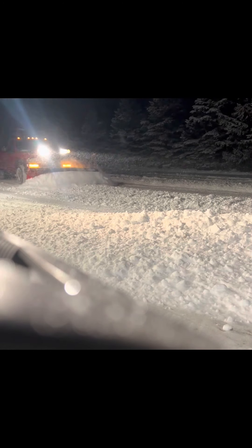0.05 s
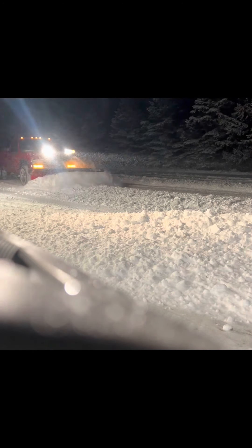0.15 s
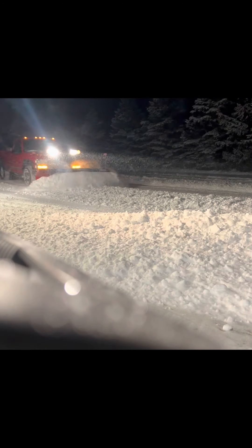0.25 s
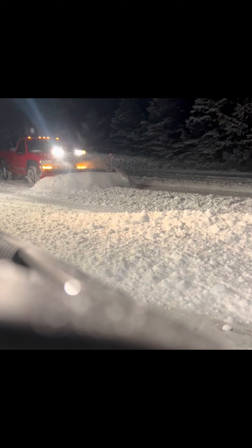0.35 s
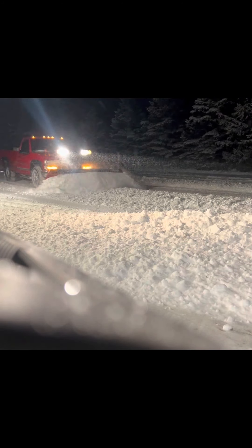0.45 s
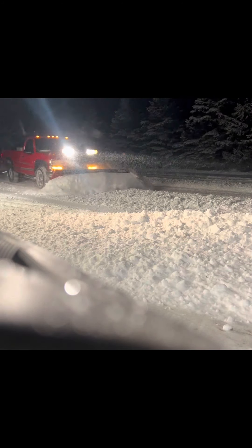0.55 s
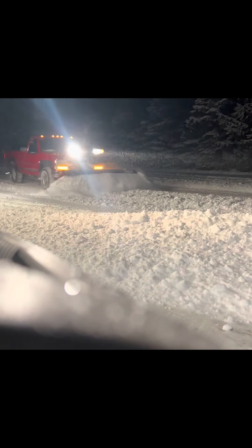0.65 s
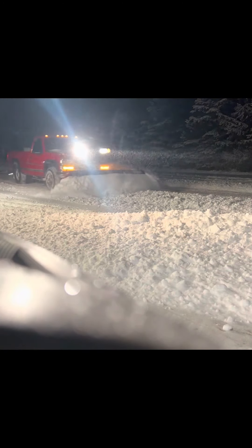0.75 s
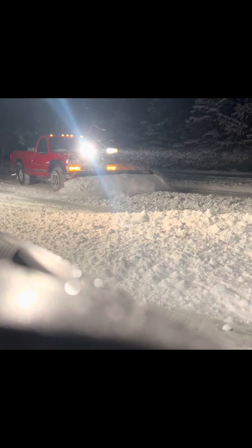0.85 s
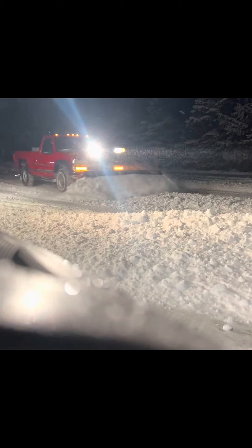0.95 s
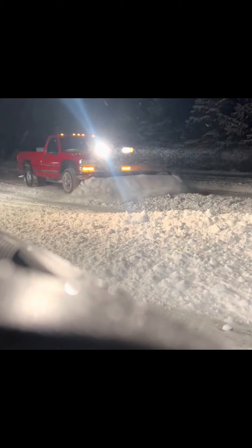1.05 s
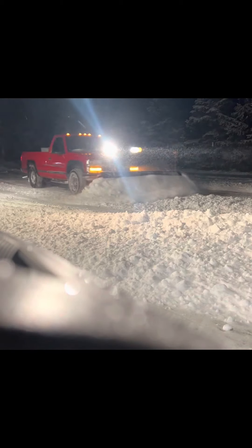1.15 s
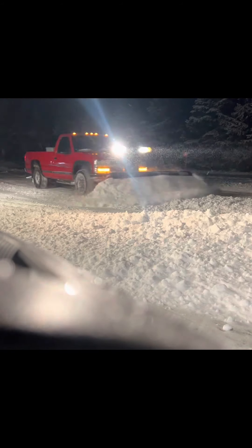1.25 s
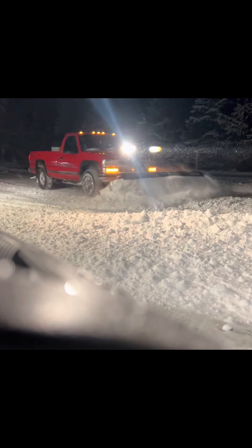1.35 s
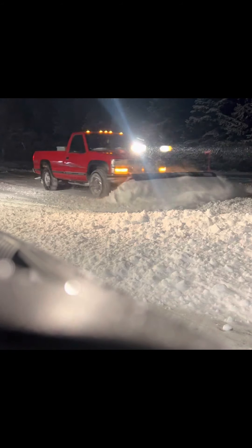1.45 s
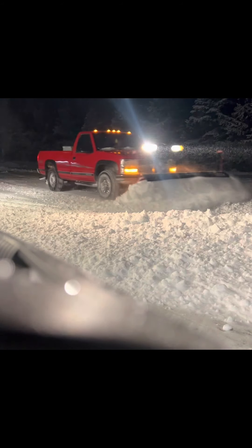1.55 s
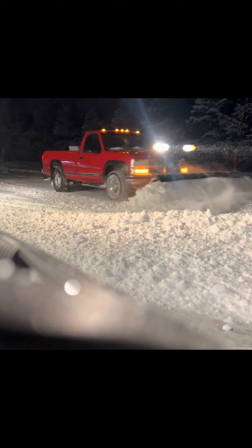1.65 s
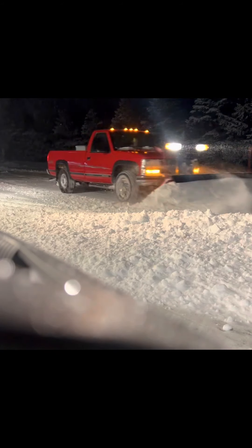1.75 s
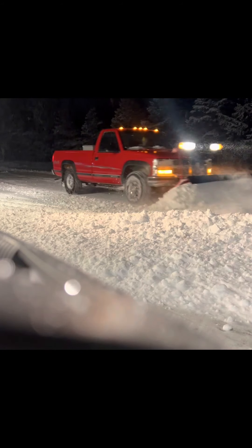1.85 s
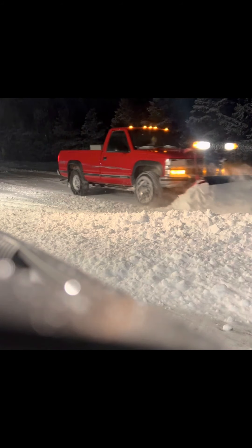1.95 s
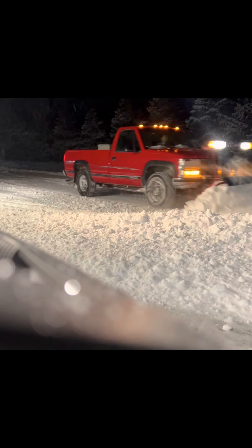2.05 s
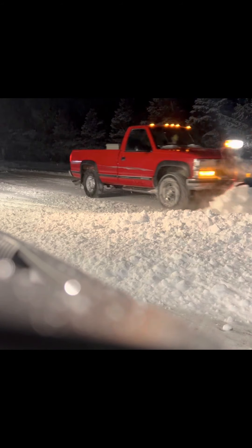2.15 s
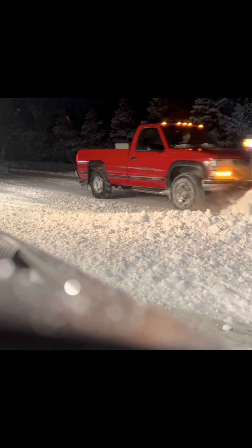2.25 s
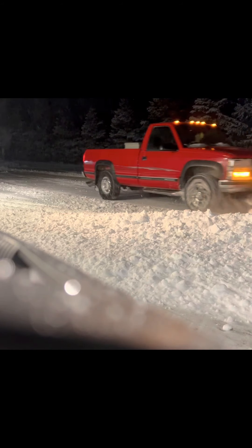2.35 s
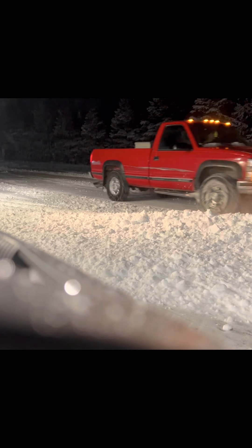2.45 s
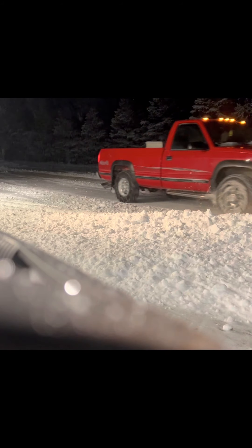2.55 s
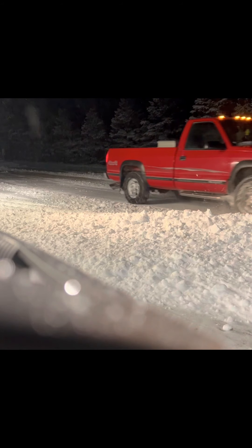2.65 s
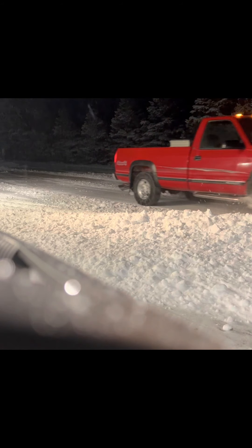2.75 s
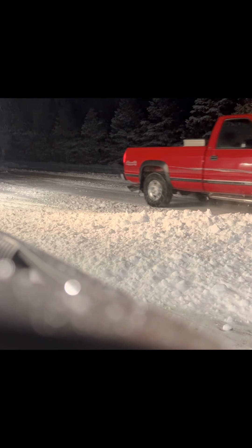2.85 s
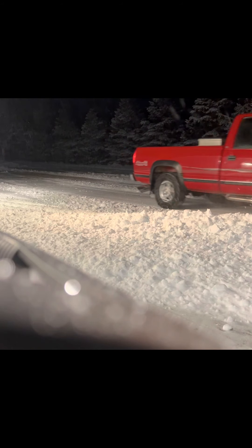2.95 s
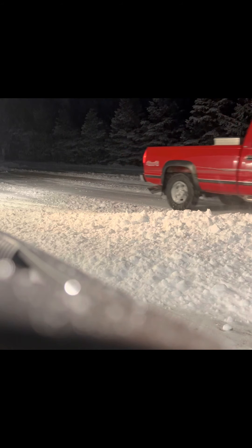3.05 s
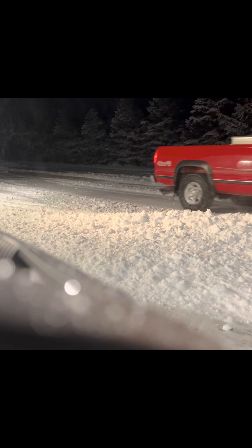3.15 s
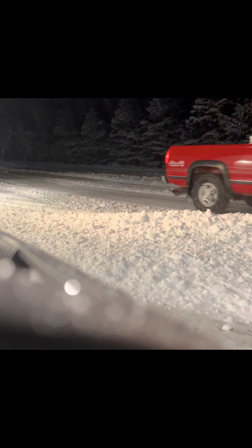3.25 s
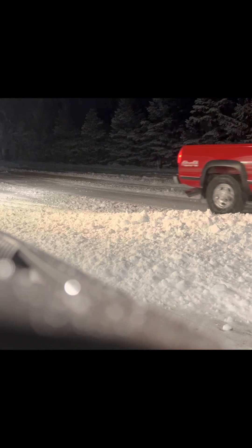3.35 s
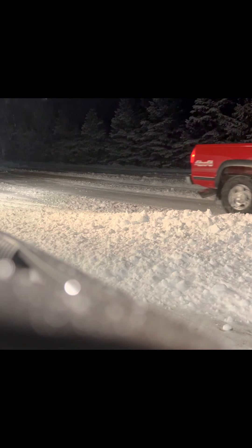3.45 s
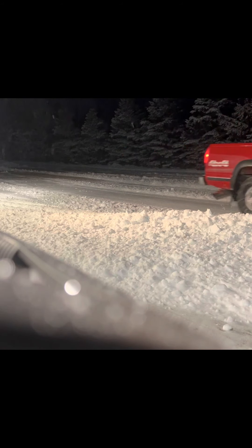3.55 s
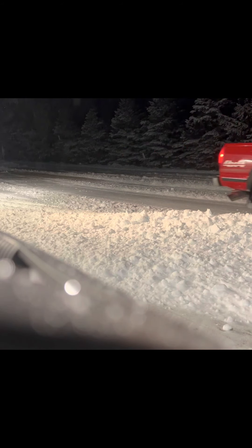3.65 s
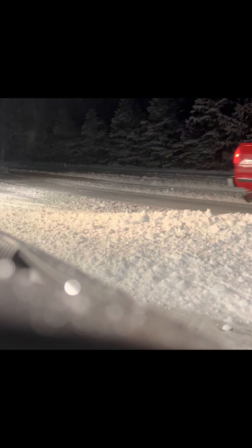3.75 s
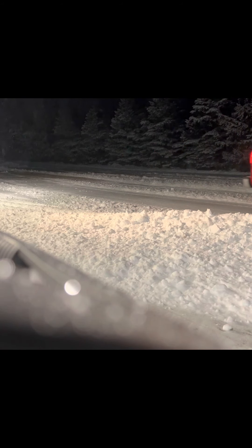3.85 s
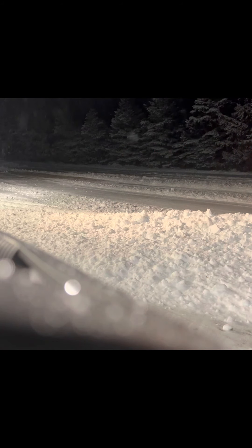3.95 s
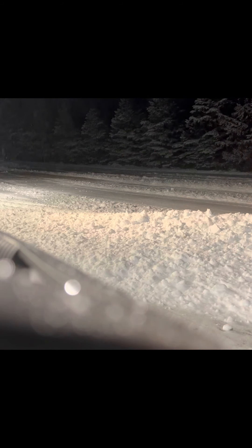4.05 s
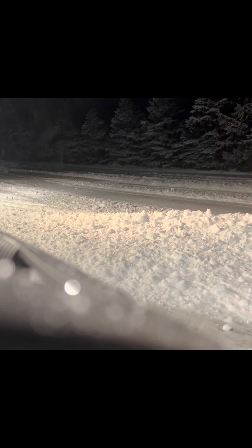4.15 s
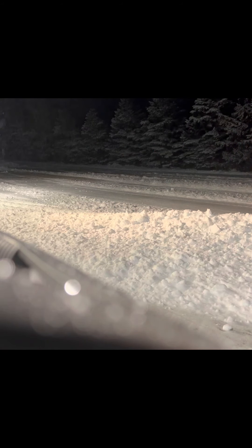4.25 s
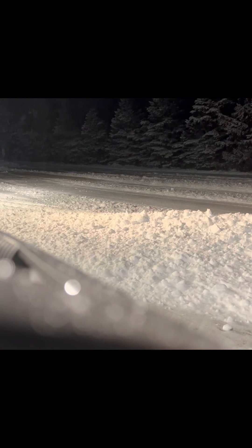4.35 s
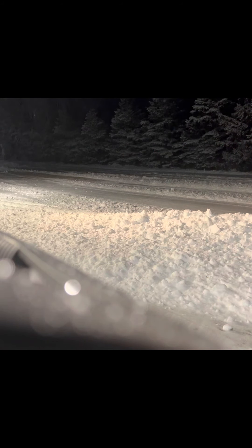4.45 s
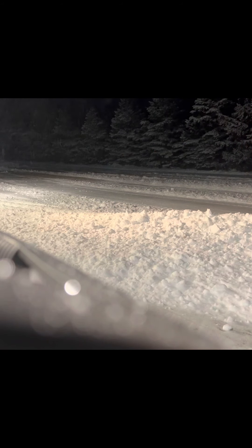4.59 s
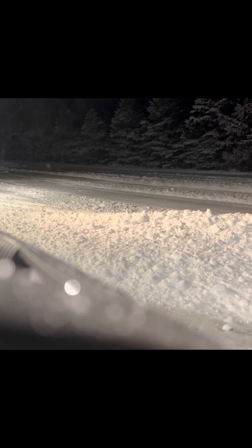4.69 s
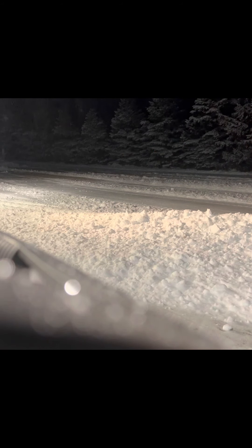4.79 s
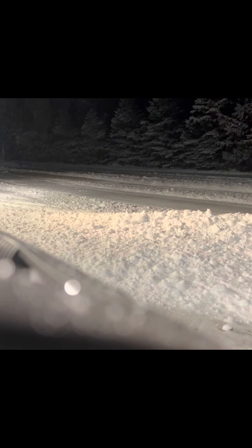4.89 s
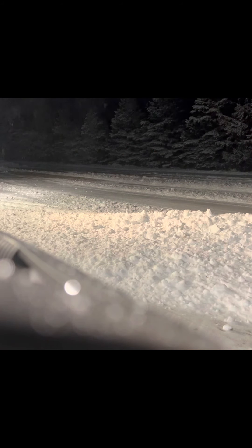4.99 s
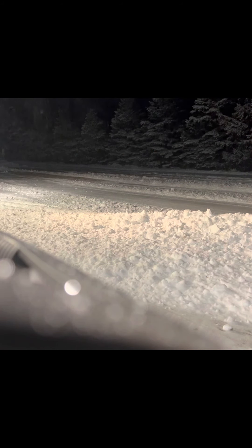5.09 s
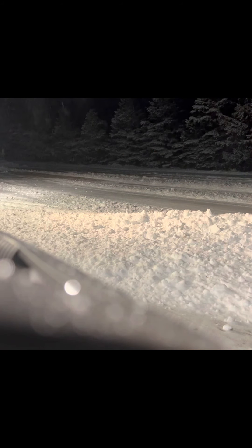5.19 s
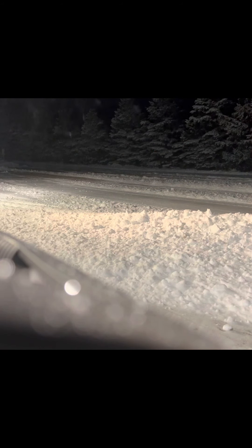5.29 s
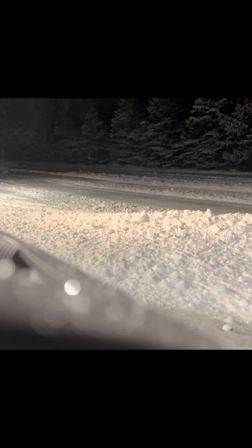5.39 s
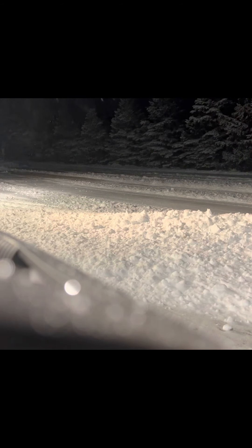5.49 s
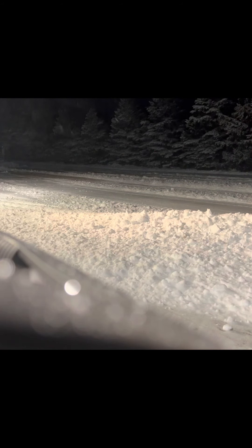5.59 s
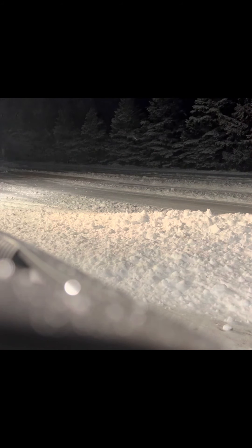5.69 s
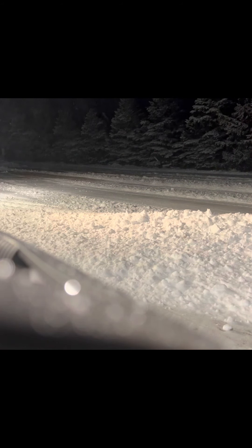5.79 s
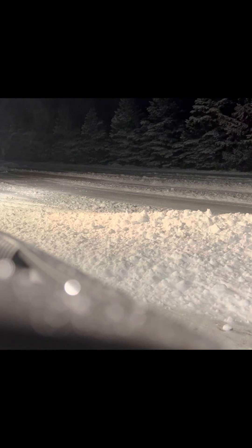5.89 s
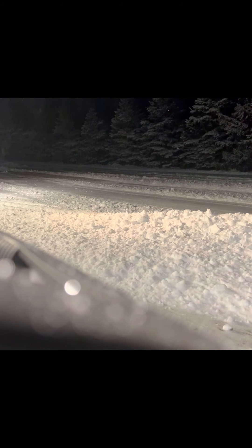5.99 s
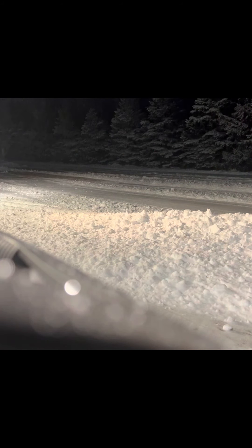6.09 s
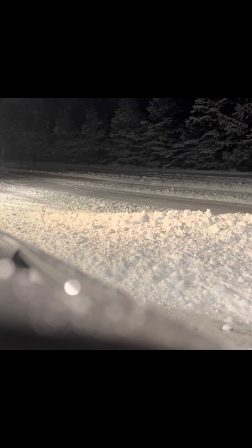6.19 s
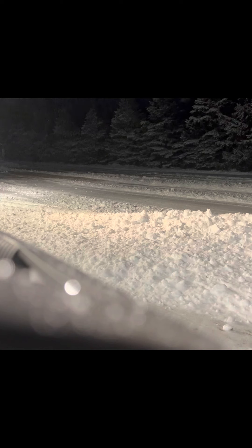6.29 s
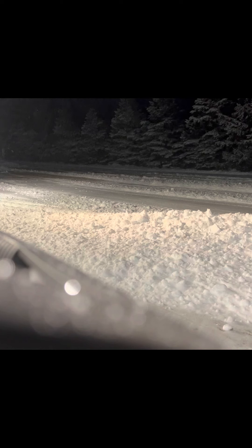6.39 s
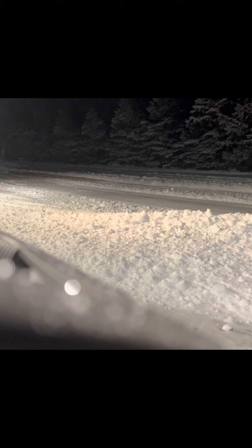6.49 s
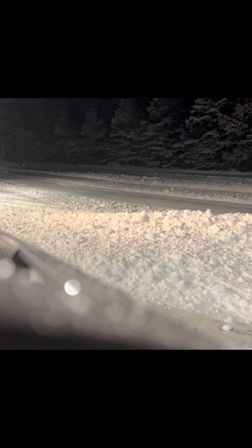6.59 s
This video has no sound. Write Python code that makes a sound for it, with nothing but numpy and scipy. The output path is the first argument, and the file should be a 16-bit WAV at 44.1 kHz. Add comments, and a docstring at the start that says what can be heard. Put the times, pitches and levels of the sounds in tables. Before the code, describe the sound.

Deep loping diesel exhaust swells by with crunching, hissing snow and blade rattle, then drops away with turbo whine, one short rev and uneven idle.

```python
"""A straight-piped diesel V8 pickup ploughs snow past a parked car, lifts off, blips the throttle and idles.
Two microphone ports at the car hear it pass 4.67 m away: uneven firings make tones that lope and boom in the cabin.
Injectors clatter as noise ringing in the panels; the turbo whistles and winds down as smeared tones.
Snow hisses and crunches in filtered grains, the blade rattles in runs of ringing knocks, metal squeaks,
and gusts of low filtered noise buffet the ports."""
import sys
import numpy as np
from scipy import signal
from scipy.fft import rfft, irfft
from scipy.io import wavfile
from scipy.ndimage import uniform_filter1d

SR = 44100
rng = np.random.default_rng(int(sys.argv[2]) if len(sys.argv) > 2 else 0)


def put_to_file(sound):
    """Save the sound as 16-bit audio at rate SR, in the file named by the first command-line argument."""
    columns = np.atleast_2d(sound).T  # one column per channel
    safe = np.clip(columns, -1, 1)
    whole_steps = np.round(safe * 32767)
    wavfile.write(sys.argv[1], SR, whole_steps.astype(np.int16))


N = 292383
TIME = np.arange(N) / SR  # s
FREQ = np.fft.rfftfreq(N, 1 / SR) + 1e-3  # Hz, kept above zero for the logarithm

# presses of the throttle: (start [s], end [s], attack [s])
PRESSES = [(0.76, 1.28, 0.16), (1.45, 4.21, 0.11), (3.3, 4.27, 0.25), (4.76, 5.14, 0.18)]
RELEASE_S = 0.07
# narrow rings of the body panels and glass: (frequency [Hz], width [Hz], lift [dB])
PANEL_RINGS = [(373, 14, -3), (446, 33, 6), (593, 18, 5.5), (674, 44, 4), (692, 26, 6.5), (1120, 32, 6),
               (847, 105, 4.5), (1950, 310, 0), (4230, 97, 6), (9400, 120, -0.5)]
NEAREST_M = 4.67  # distance of the truck as it passes
CLATTER_BAND = (650, 2400)  # Hz


def undb(db):
    """Decibels to gain."""
    return 10 ** (np.asarray(db) / 20)


def curves(table):
    """Each column of a table as a line through time."""
    s, *columns = np.transpose(table)
    return [np.interp(TIME, s, c) for c in columns]


def over_hz(points):
    """Join (Hz, value) points on a log-frequency axis."""
    hz, value = np.transpose(points)
    return np.interp(np.log(FREQ), np.log(hz), value)


def lift(hz, modes):
    """The dB that resonances add at these frequencies."""
    return sum(db / (1 + (2 * (hz - f) / width) ** 2) for f, width, db in modes)


def colour(x, db, band):
    """Filter by a dB curve and bring the rms inside the band to 1."""
    spectrum = rfft(x) * undb(db)
    inside = (FREQ > band[0]) & (FREQ < band[1])
    return irfft(spectrum, N) / irfft(spectrum * inside, N).std()


def walk(rate):
    """Smooth random drift of rms 1; a higher rate (Hz) moves faster."""
    y = irfft(rfft(rng.standard_normal(N)) * np.exp(-(FREQ / rate) ** 2), N)
    return y / y.std()


def grains(rate, spread_db):
    """Random clicks of uneven size, about rate of them a second; rms 1."""
    size = undb(spread_db * np.minimum(rng.exponential(size=N), 5))
    y = (rng.random(N) < rate / SR) * size * rng.standard_normal(N)
    return y / y.std()


def burst(start, rise, decay):
    """An envelope that swells quickly and dies away."""
    age = np.maximum(TIME - start, 0)
    return np.minimum(age / rise, 1) * np.exp(-np.maximum(age - rise, 0) / max(decay, 1e-3))


def swell(start, length):
    """A rounded bump."""
    return np.sin(np.pi * np.clip((TIME - start) / length, 0, 1))


def held(start, end, attack, release):
    """An envelope that rises from start, holds until end and falls back."""
    rising = (TIME - start) / attack
    falling = 1 - (TIME - end) / release
    return np.clip(np.minimum(rising, falling), 0, 1)


def whistle(hz, width_hz):
    """A wavering tone of rms 1: two random drifts smear its phase and strength."""
    phase = 2 * np.pi * np.cumsum(hz * np.ones(N)) / SR
    return walk(width_hz) * np.cos(phase) + walk(width_hz) * np.sin(phase)


def distance():
    """Metres from truck to microphone: a steady approach, then coasting towards a halt past the nearest point."""
    nearest_s, approach_m_s, coast_s = 3.004, 3.75, 2.38
    since = TIME - nearest_s
    coasting = coast_s * (1 - np.exp(-np.maximum(since, 0) / coast_s))
    travel_s = np.minimum(since, 0) + coasting
    return np.hypot(NEAREST_M, approach_m_s * travel_s)


def revving():
    """1 during the last press, a free rev with no load on the engine."""
    return held(*PRESSES[-1], RELEASE_S)


def levels(cycle_hz, aspect):
    """The dB of lope, overtones, clatter and hiss follow distance, the side that is heard and the throttle."""
    # layer settings at the nearest point, off throttle, before each layer's own trim:
    # (front [dB], flank [dB], rear [dB], change per doubling of distance [dB])
    lope_level = (-23.5, -20, -18, -4.5)
    overtone_level = (-30.5, -28, -25, -6)
    clatter_level = (-35.5, -42, -41, -1.5)
    hiss_level = (-40, -36.5, -41.5, -20.5)
    # what each press adds: (lope [dB, scaled by effort], overtones [dB], clatter [dB], snow hiss [dB])
    press_db = [(6, 2, -2.5, 1.5), (7, 3.5, 0, -3), (-4.5, 0.5, 2.5, 2.5), (8, 9.5, 8, 7)]
    # the idle hunts as it settles: (crest [s], lope [dB], overtones [dB])
    idle_surges = [(5.3, 1.5, 4), (5.51, 2.5, 5.5), (5.72, 6, 3.5), (6.22, 6.5, 4.5)]
    # the blade scrapes and shoves heavy snow, swelling the mid-range noise:
    # (start [s], length [s], swell of the clatter layer [dB])
    blade_shoves = [(-0.04, 0.066, 11.5), (0.705, 0.55, 4), (1.827, 0.17, 2), (2.66, 0.41, 2),
                    (3.452, 0.76, 4.5)]
    overrun_s, overrun_db = 0.15, -3.5
    surge_s, sag_share = 0.13, 0.17
    tail_on_s, tail_fade_db_per_s = 4.3, -2

    doublings = np.log2(distance() / NEAREST_M)
    lope, overtones, knock, hiss = (
        np.interp(aspect, np.arange(3), sides) + falloff * doublings
        for *sides, falloff in (lope_level, overtone_level, clatter_level, hiss_level))
    # a press changes the lope more the faster the engine turns
    effort = (cycle_hz / 9.88) ** 2.74
    for (start, end, attack), (lope_db, overtone_db, clatter_db, hiss_db) in zip(PRESSES, press_db):
        pedal = held(start, end, attack, RELEASE_S)
        lope += lope_db * pedal * effort
        lope += overrun_db * swell(end, overrun_s)  # the fuel is cut and the lope sags
        overtones += overtone_db * pedal
        knock += clatter_db * pedal
        hiss += hiss_db * pedal
    for crest, lope_db, overtone_db in idle_surges:
        surge = swell(crest - surge_s / 2, surge_s)
        sag = sag_share * swell(crest + surge_s / 2, surge_s)
        lope += lope_db * (surge - sag)
        overtones += overtone_db * surge
    # the tailgate shields the engine more and more as the truck draws away
    knock += tail_fade_db_per_s * np.maximum(TIME - tail_on_s, 0)
    knock += sum(db * swell(start, length) for start, length, db in blade_shoves)
    return lope, overtones, knock, hiss


def gusts():
    """Puffs of wind thud on the microphone as low noise, partly different at each port."""
    # (time [s], level before trim [dB], left minus right [dB], decay [s])
    puffs = [(0.062, -28, 0.5, 0.043), (0.132, -27.5, 0, 0.01), (0.226, -32, -19, 0.012),
             (0.268, -31.5, -1, 0.032), (0.325, -24, -1, 0.015), (0.345, -24.5, 1, 0.0092),
             (0.354, -26.5, -2, 0.027), (0.383, -37, -2, 0.022), (0.502, -32, -1, 0.024),
             (1.096, -22, -1, 0.017), (1.238, -25.5, -1, 0.017), (1.278, -29.5, -3, 0.0076),
             (1.291, -22, 1, 0.0097), (1.395, -27, 0, 0.0087), (5.472, -32.5, -4, 0.01),
             (5.499, -36, -3, 0.008), (5.723, -25.5, 0, 0.013)]
    # wind spectrum: (frequency [Hz], level [dB per Hz, relative])
    wind_colour = [(40, 10), (100, 9.5), (170, 15), (260, 7.5), (460, 2.5), (650, -5.5), (1100, -20),
                   (2500, -80), (8000, -70)]
    both, left, right = (colour(rng.standard_normal(N), over_hz(wind_colour), (250, 700)) for _ in range(3))
    air = both + .5 * np.array([left, right])
    strength = 0
    for s, db, pan, decay in puffs:
        port_db = db - 1.0 + np.array([[pan], [-pan]]) / 2
        strength = strength + undb(port_db) * burst(s - .001, 0.0031, decay)
    return air * strength


def squeals():
    """Faint thin tones of rubbing metal glide in pitch and level off as the truck slows."""
    # (start [s], end [s], first pitch [Hz], last pitch [Hz], level [dB])
    glides = [(5.65, 6.278, 10250, 10930, -59.5), (5.903, 6.287, 10400, 10220, -62)]
    glide_s = 0.13
    out = 0
    for start, end, first_hz, last_hz, db in glides:
        hz = last_hz + (first_hz - last_hz) * np.exp(-np.maximum(TIME - start, 0) / glide_s)
        out = out + undb(db) * held(start, end, 0.034, 0.06) * whistle(hz, width_hz=18)
    return out


def squeaks():
    """Short, high chirps of rubbing metal: decaying tones with an unsteady pitch."""
    # (time [s], peak [dB], pitch [Hz], decay [s])
    chirps = [(2.079, -30, 11020, 0.016), (2.4528, -37, 11000, 0.016), (2.8339, -37, 11200, 0.02),
              (3.5324, -34, 11700, 0.02), (4.3005, -37, 11240, 0.17), (4.366, -28.5, 11350, 0.032),
              (4.575, -44, 11350, 0.013), (5.2853, -38, 11000, 0.024), (5.7705, -38, 11300, 0.017)]
    waver = np.cumsum(200 * walk(405)) / SR  # cycles; the pitch strays by 200 Hz rms
    out = 0
    for s, db, hz, decay in chirps:
        tone = np.sin(2 * np.pi * (hz * TIME + waver))
        out = out + undb(db) * burst(s - .002, .004, decay) * tone
    return out


def knocks(rate, length, centre_hz):
    """A run of small ringing knocks, each with its own pitch and strength; rms 1."""
    ring_cycles, spread_db, spread_oct = 3.5, 3, 0.24
    age = np.arange(SR // 30) / SR
    span = int(max(length, .005) * SR)
    out = np.zeros(span + len(age))
    chance = np.random.default_rng(rng.integers(2 ** 32))
    for i in range(int(rate * span / SR) + 1):
        late, pitch, size = chance.random(), chance.normal(), chance.normal()
        hz = centre_hz * 2 ** (spread_oct * pitch)
        at = min(int((i + late) / rate * SR), span)
        ring = np.exp(-age * hz / ring_cycles) * np.sin(2 * np.pi * hz * age)
        out[at:at + len(age)] += undb(spread_db * size) * ring
    return out / np.sqrt(np.sum(out ** 2) / span)


def rattles():
    """The blade chatters over packed snow, and its scraping frame breaks into louder runs of knocks."""
    # (start [s], length [s], level [dB], centre pitch [Hz])
    loud_runs = [(-0.01, 0.062, -34, 1380), (0.05, 0.086, -41.5, 865), (0.202, 0.17, -43.5, 1350),
                 (0.462, 0.079, -46, 1210), (0.506, 0.018, -35, 780), (0.684, 0.052, -45, 1070),
                 (0.722, 0.02, -41, 750), (0.811, 0.057, -42.5, 1215), (0.91, 0.046, -37, 1060),
                 (1.03, 0.047, -39, 1230), (1.13, 0.031, -42.5, 1670), (1.089, 0.22, -43, 460),
                 (1.852, 0.18, -37, 940), (2.262, 0.02, -37, 1080), (2.832, 0.02, -33, 1100),
                 (2.91, 0.087, -37.5, 980), (3.037, 0.066, -36.5, 990), (3.385, 0.068, -35, 447),
                 (3.599, 0.031, -39.5, 1470), (3.66, 0.017, -33, 427), (3.772, 0.048, -39, 1500),
                 (3.884, 0.02, -32.5, 448), (4.881, 0.02, -33, 945), (5.268, 0.038, -40.5, 1740)]
    # loose chatter while the blade is down:
    # (start [s], end [s], level at the nearest point [dB], centre pitch [Hz])
    loose_chatter = (0.8, 4.0, -45.5, 960)

    def place(start, run):
        return np.interp(TIME, start + np.arange(len(run)) / SR, run, left=0, right=0)

    start, end, db, hz = loose_chatter
    chatter = place(start, knocks(70, end - start, hz))
    out = chatter * undb(db) * np.sqrt(NEAREST_M / distance())
    for s, length, db, hz in loud_runs:
        out = out + undb(db) * place(s, knocks(360, length, hz))
    return out


def snow(level_db):
    """Packed snow breaks in countless grains; now and then a clod gives way with a crunch."""
    # hiss spectrum: (frequency [Hz], level [dB per Hz, relative])
    hiss_colour = [(900, 7.5), (2300, 8), (3500, 2), (5000, -2), (6500, 5.5), (8200, 4), (10300, 0.5),
                   (11500, 8), (13000, -9), (15500, 1)]
    # clods crunching under the blade:
    # (time [s], level before trim [dB], low crackle against crisp grains [dB], decay [s])
    clods = [(0.0094, -34, 2.5, 0.051), (0.2244, -44, 7.5, 0.045), (0.295, -43, 7, 0.034),
             (0.9383, -34, 2, 0.021), (1.0301, -31.5, 1, 0.018), (1.058, -23, -4, 0.017),
             (1.279, -33, 1, 0.021), (1.7886, -29.5, -4, 0.041), (1.87, -24, -5, 0.021),
             (1.914, -26, -6, 0.017), (2.196, -20.5, -22, 0.015), (2.2655, -25, -7, 0.029),
             (2.292, -23.5, -5, 0.025), (2.76, -23.5, -1, 0.022), (2.955, -22.5, 0.5, 0.025),
             (2.989, -29, 0, 0.048), (3.07, -24.5, 4.5, 0.011), (3.2113, -20, -16, 0.0074),
             (3.234, -20, -11, 0.029), (3.5157, -27, 3.5, 0.048), (3.598, -29, 5.5, 0.032),
             (3.699, -26, 0, 0.007), (3.781, -25.5, 3.5, 0.045), (3.803, -13, -11, 0.0072),
             (4.307, -21, -8, 0.011), (4.878, -29.5, 0, 0.021), (5.2619, -29, -4, 0.049),
             (5.393, -36, -4, 0.011)]
    rise_share = 0.16  # of the decay, so that slow clods give way softly
    crisp_colour = [(2000, 4.5), (4500, 9.0), (7600, 13.0), (10500, 5.5), (15000, -1)]
    crackle_colour = [(300, -18), (900, -5), (1500, 2), (2200, -1), (4000, -9), (8000, -26)]

    hiss_tone = over_hz(hiss_colour) + lift(FREQ, PANEL_RINGS)
    hiss = colour(grains(rate=9000, spread_db=-0.5), hiss_tone, (5500, 9500))
    out = hiss * undb(level_db - 2.0 + 1.26 * walk(47))
    crisp = colour(grains(rate=6000, spread_db=3.2), over_hz(crisp_colour), (4000, 12000))
    crackle = colour(grains(rate=4000, spread_db=2.4), over_hz(crackle_colour), CLATTER_BAND)
    for s, db, low_db, decay in clods:
        crumble = burst(s - .002, rise_share * decay, decay)
        out = out + undb(db - 10.5) * crumble * (crisp + undb(low_db) * crackle)
    return out


def buzzes():
    """Narrow rings of sheet metal, shaken by the revving engine."""
    # (start [s], end [s], pitch [Hz], width [Hz], level [dB])
    sheet_rings = [(4.94, 5.11, 715, 40, -43), (4.9, 5.09, 3020, 260, -49)]
    return sum(undb(db) * held(start, end, 0.026, 0.03) * whistle(hz, width)
               for start, end, hz, width, db in sheet_rings)


def turbo():
    """A thin whistle as the load comes on, and a long wavering whine as the rotor runs down."""
    # whistle as the engine takes up load: (start [s], end [s], level [dB])
    load_whistles = [(0.68, 1.05, -61.5), (1.4, 1.78, -58)]
    # the rotor runs down: (time [s], pitch before waver [Hz], level before flutter [dB])
    run_down = [(3.3, 5700, -70), (3.45, 5550, -51), (3.9, 5100, -56), (4.08, 4990, -48), (4.36, 4700, -54),
                (4.55, 4450, -50), (4.82, 4300, -50), (5.15, 4100, -57), (5.42, 3900, -56),
                (5.66, 3680, -67), (5.95, 3500, -56), (6.25, 3450, -59), (6.63, 3140, -56)]
    load = sum(undb(db) * held(start, end, 0.037, .1) for start, end, db in load_whistles)
    loaded = whistle(7340, width_hz=89) * load
    hz, db = curves(run_down)
    whine = whistle(hz * (1 + 0.006 * walk(8.6)), width_hz=185)
    return loaded + whine * undb(db + 1.4 * walk(31))


def clatter(turns, aspect, level_db):
    """Each injection knocks a burst of noise out of the block; the panels ring with it."""
    # spectrum from each side: (frequency [Hz], front, flank, rear, revving [each dB per Hz, relative])
    clatter_colour = [(167, 32, 38.5, -9, -9), (354, 11.5, 13.5, 13.5, 6.5), (412, 7, 3.5, 5, -4),
                      (620, 5.5, 5, 0.5, -4), (760, 0, -19, 2, 1), (1280, 2, -0.5, -2, -5.5),
                      (1540, -4.5, -17, -8.5, -19), (2095, -5.5, 0.5, -1.5, -2),
                      (2490, -13.5, -20, -12, -14), (3120, -10.5, -15, -7, -7),
                      (4060, -19.5, -21, -18, -19), (4640, -16.5, -11.5, -8.5, -12),
                      (7900, -26, -31, -38, -30)]
    knock = 1 + .8 * np.exp(-(8 * turns % 1) / .35)  # eight a cycle
    lope = 1 + .18 * np.cos(2 * np.pi * 4 * turns)
    drive = knock * lope * grains(rate=6000, spread_db=0.8) * undb(1.0 * walk(13.4))
    low_cut = over_hz([(100, -24), (260, -9), (380, 0)])
    rev = revving()
    shares = [(1 - rev) * np.maximum(1 - abs(np.minimum(aspect, 2) - side), 0) for side in range(3)]
    shares.append(rev)
    out = 0
    for side, share in enumerate(shares):
        side_colour = [(hz, db[side]) for hz, *db in clatter_colour]
        tone = over_hz(side_colour) + lift(FREQ, PANEL_RINGS) + low_cut
        out = out + share * colour(drive, tone, CLATTER_BAND)
    return out * undb(level_db - 1.48)


def exhaust(cycle_hz, turns, aspect, lope_db, overtone_db):
    """Two banks fire at uneven gaps, so the pipe sounds many multiples of the cycle rate, lifted by the cabin."""
    # relative strength of each tone:
    # (multiple of the cycle rate, front [dB], flank and rear [dB], idling [dB], revving [dB])
    pipe_tones = [(5, -2, -9, -30, -18), (6, -23, -19, -40, -24), (7, -1, -3, -22, -10),
                  (8, -7, -2, -17, -2), (9, -4, -4, -13, -5), (10, -17, -18, -15, -18), (11, 0, 0, -18, 0),
                  (12, -12, -30, 0, -24), (13, -7, -8, -18, -9), (14, -22, -26, -9, -19),
                  (15, -25, -11, -29, -12), (16, -8, -12, -12, -13), (17, -34, -15, -24, -18),
                  (18, -13, -16, -13, -20), (19, -26, -5, -28, -11), (20, -25, -12, -19, -12),
                  (21, -25, -18, -20, -10), (22, -17, -14, -18, -10), (23, -21, -12, -18, -10),
                  (24, -28, -6, -25, -7), (25, -36, -20, -15, -16), (26, -18, -20, -16, -12),
                  (27, -28, -23, -16, -17), (28, -38, -25, -11, -17), (29, -27, -25, -16, -19),
                  (30, -34, -24, -11, -15), (31, -33, -24, -18, -17), (32, -39, -16, -21, -19),
                  (33, -36, -22, -18, -23), (34, -35, -17, -37, -20), (35, -37, -23, -27, -16),
                  (36, -38, -24, -27, -27), (37, -26, -27, -31, -31), (38, -36, -41, -22, -20),
                  (39, -31, -31, -20, -23), (40, -29, -30, -23, -30), (41, -30, -24, -27, -40),
                  (42, -32, -24, -26, -32), (43, -32, -25, -30, -33), (44, -38, -30, -42, -35)]
    # cabin resonances: (frequency [Hz], width [Hz], lift [dB])
    cabin_modes = [(72, 24, 5), (110, 28, 9), (133, 12, -5), (189, 11, 10), (211, 14, -5), (233, 12, 7),
                   (271, 15, 12), (355, 25, 4)]
    # scatter of the firings against the clean tones: (front, flank and rear, idling, revving [each dB])
    lope_rough_db = [-17, -18, -14, -20]
    overtone_rough_db = [-22, -21, -8, -22]
    rumble_colour = [(18, -40), (32, -18), (48, -2), (65, 0), (90, -3), (125, -6), (170, -22), (500, -70)]
    burble_colour = [(90, 4.5), (150, -3.5), (200, -13), (280, -7.0), (330, -18.5), (500, -29), (1500, -73)]
    idle_below_hz, phase_spread = 7.3, .88

    slots = np.array([0, 2, 3, 5, 1.3, 4.3, 6.3, 7.3]) / 8  # firing times as shares of a cycle
    bank = np.repeat([1, .5], 4)  # the far bank arrives later and weaker
    throttle = np.max([held(*press, RELEASE_S) for press in PRESSES], axis=0)
    idling = np.clip(idle_below_hz - cycle_hz, 0, 1) * (1 - throttle)
    state = np.clip(aspect, 0, 1) + idling  # 0 front, 1 flank and rear, 2 idling
    rev = revving()

    def facing(db):
        return (1 - rev) * np.interp(state, np.arange(3), db[:-1]) + rev * db[-1]

    lope, overtones = np.zeros(N), np.zeros(N)
    for k, *tone_db in pipe_tones:
        hz = k * cycle_hz
        phase = np.angle(np.sum(bank * np.exp(-2j * np.pi * k * slots)))
        phase -= phase_spread * k ** 2  # spread the phases of the tones so the firings throb less sharply
        waver_db = np.interp(TIME, np.linspace(0, TIME[-1], 24), rng.normal(0, 1.1, 24))
        gain = undb(facing(tone_db) + lift(hz, cabin_modes) + waver_db)
        line = gain * np.cos(2 * np.pi * k * turns + phase)
        upper = np.clip((hz - 130) / 20, 0, 1)  # lope below 130 Hz, overtones above 150 Hz
        lope += line * (1 - upper)
        overtones += line * upper

    # no two firings burn alike: their scatter rings the pipe between the tones
    firings = np.diff(np.floor(8 * turns), prepend=0) * rng.standard_normal(N)
    rumble = colour(firings, over_hz(rumble_colour), (35, 135))
    burble = colour(firings, over_hz(burble_colour) + lift(FREQ, cabin_modes), (145, 320))
    out = 0
    for lines, scatter, rough_db, db in ((lope, rumble, lope_rough_db, lope_db),
                                         (overtones, burble, overtone_rough_db, overtone_db)):
        rough = undb(facing(rough_db))
        # even out the strength over a quarter of a second
        clean = lines / np.sqrt(uniform_filter1d(lines ** 2, size=SR // 4))
        out = out + undb(db) * (clean + rough * scatter) / np.hypot(1, rough)
    return out


def ports(x):
    """Sound meets the two ports out of step; reflections off the car body ripple it and shift over time."""
    # phase between the ports: (frequency [Hz], lead of the left [radians])
    port_phase = [(60, .03), (250, .25), (450, .8), (680, 1.6), (790, .6), (900, -.7), (1100, -.2),
                  (1500, 0), (4100, -.05), (4900, -1.1), (5400, .3), (7000, 0), (8200, -.7), (10000, -1.6),
                  (11700, -2.3), (12800, -3.1)]
    # (frequency [Hz], left minus right [dB])
    port_balance = [(60, -.3), (270, -1), (420, 1.5), (600, 5.5), (850, 1.5), (1200, 0)]
    # short echo between glass and bodywork, the same at both ports: (frequency [Hz], level [dB])
    echo_level = [(250, -40), (500, -7), (3000, -7), (12000, -7)]
    # scattered sound that differs between the ports: (frequency [Hz], level [dB])
    scatter_level = [(60, -42), (125, -26), (250, -22), (480, -6), (750, -5), (1100, -12), (1600, -40),
                     (3800, -38), (4800, -6), (6500, -26), (8500, -10), (15000, -10)]
    sign = np.array([[1], [-1]])
    direct = np.exp(.5j * over_hz(port_phase) * sign) * undb(over_hz(port_balance) * sign / 2)
    echo, scatter = undb(over_hz(echo_level)), undb(over_hz(scatter_level))
    place = np.linspace(0, 7, N)  # crossfades through eight sets of reflections
    decays = np.array([burst(.001, .001, .006), burst(.001, .001, .02)])
    out = 0
    for k in range(8):
        tails = rng.standard_normal((2, N)) * decays
        shared, apart = rfft(tails / np.linalg.norm(tails, axis=1, keepdims=True))
        ripple = (1 + echo * shared) / np.hypot(1, echo)
        nearby = x * np.maximum(1 - abs(place - k), 0)
        out = out + rfft(nearby) * (direct * ripple + sign * apart * scatter)
    return irfft(out, N)


def scene():
    """The truck passes by; the wind is right at the ports."""
    # engine speed: (time [s], four-stroke cycles per second [Hz])
    engine_speed = [(0, 11.33), (0.7, 11.33), (1.05, 11.84), (1.5, 11.22), (1.85, 11.08), (2.25, 10.6),
                    (2.67, 10.58), (3.12, 9.18), (3.4, 9.06), (3.78, 9.01), (4.05, 8.44), (4.27, 7.64),
                    (4.42, 5.42), (4.72, 5.3), (4.87, 6.72), (5.0, 7.59), (5.17, 7.98), (5.55, 5.37),
                    (6.63, 5.56)]
    # side of the truck that is heard: (time [s], side [0 front, 1 flank, 2 rear])
    side_heard = [(0, -0.39), (2.55, 0.17), (3.15, 0.39), (3.9, 1.94)]
    cycle_hz, = curves(engine_speed)
    aspect, = curves(side_heard)
    lope_db, overtone_db, clatter_db, snow_db = levels(cycle_hz, aspect)
    turns = np.cumsum(cycle_hz) / SR  # engine cycles so far
    blade = snow(snow_db) + rattles() + squeaks() + squeals()
    engine = clatter(turns, aspect, clatter_db) + turbo() + buzzes()
    engine = engine + exhaust(cycle_hz, turns, aspect, lope_db, overtone_db)
    edges = np.clip(np.minimum(TIME, TIME[-1] - TIME) / .006, 0, 1)  # 6 ms fades
    return ports((blade + engine) * edges) + gusts()


def record(dry):
    """The recorder cuts the deepest bass below 33 Hz and the top above 15.7 kHz."""
    thinned = signal.sosfilt(signal.butter(4, 33, "high", fs=SR, output="sos"), dry)
    return signal.sosfilt(signal.ellip(8, .2, 70, 15700, fs=SR, output="sos"), thinned)


dry = scene()
out = record(dry)
put_to_file(out)
```